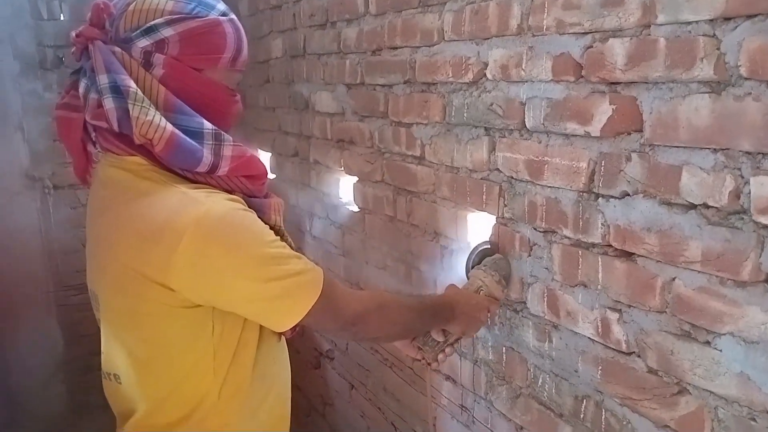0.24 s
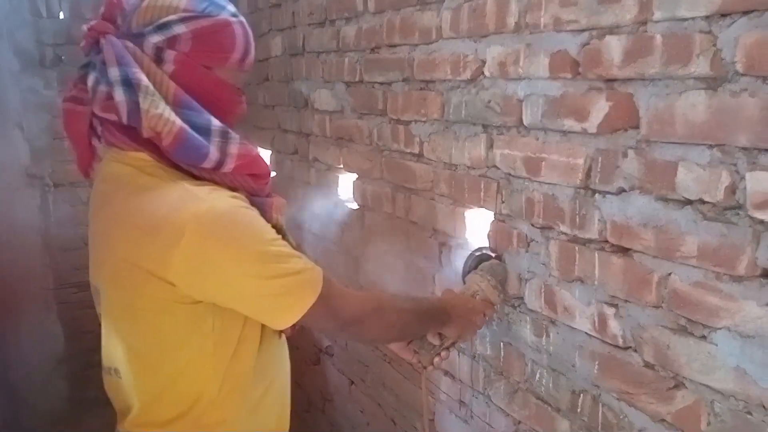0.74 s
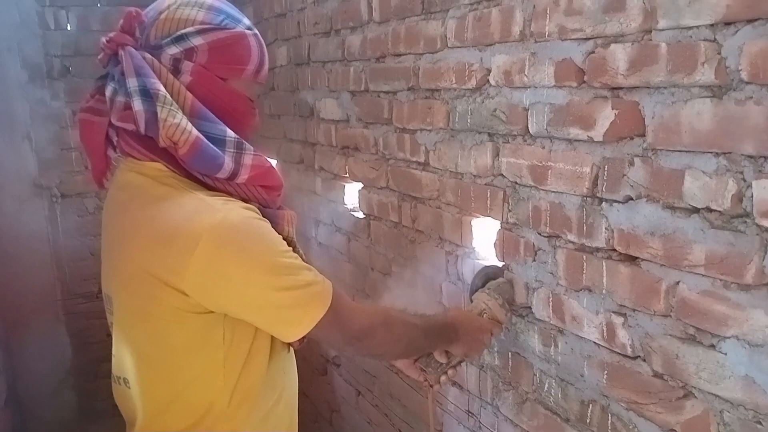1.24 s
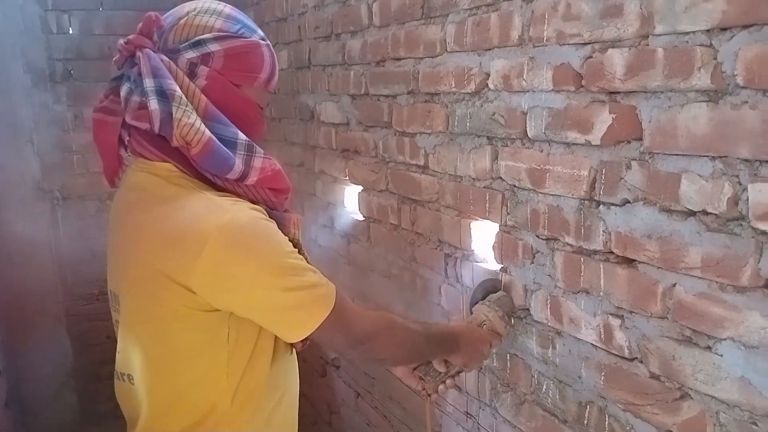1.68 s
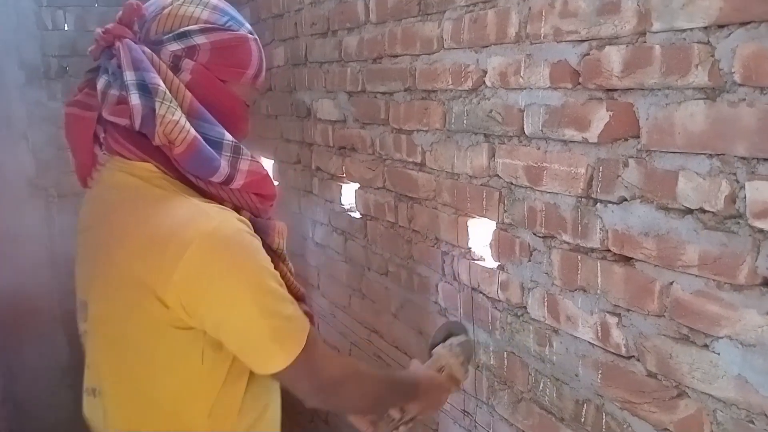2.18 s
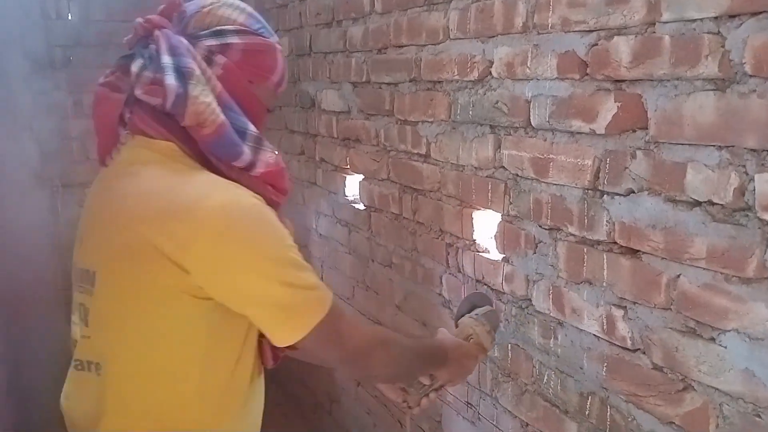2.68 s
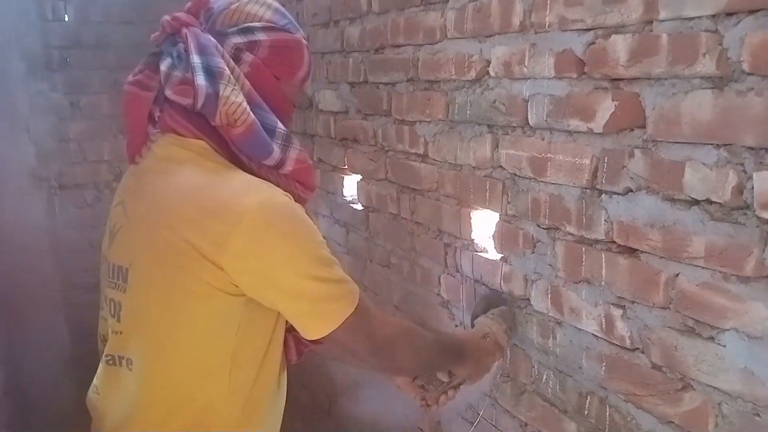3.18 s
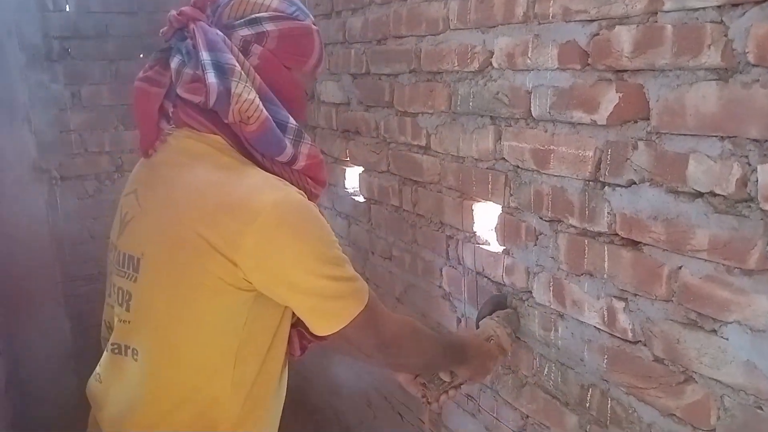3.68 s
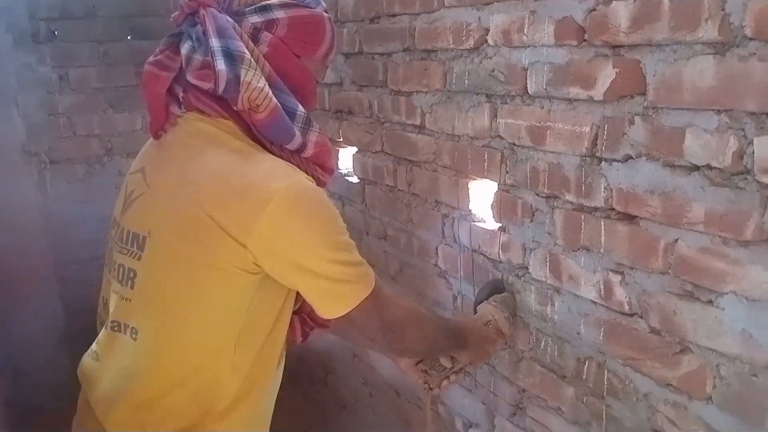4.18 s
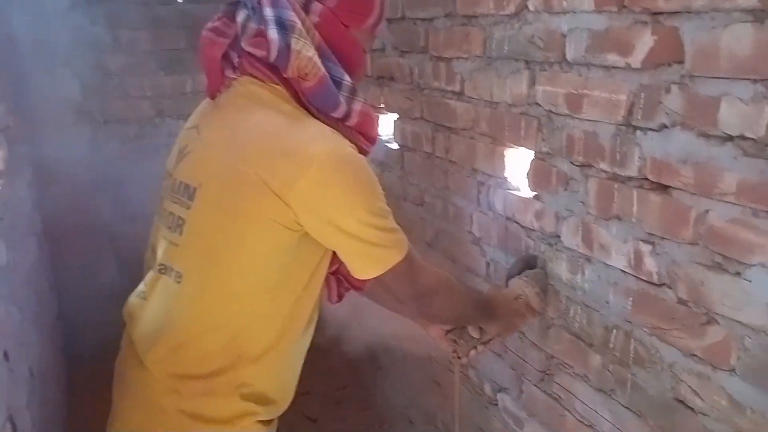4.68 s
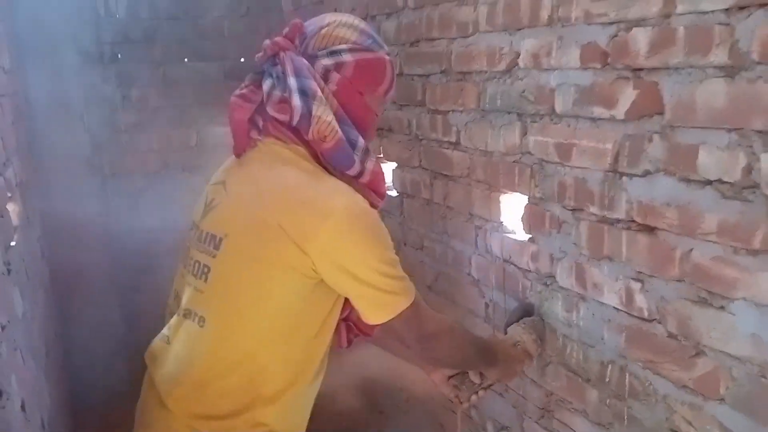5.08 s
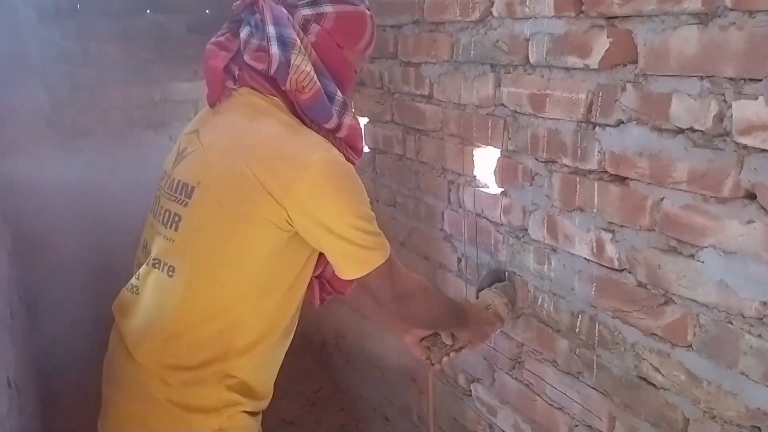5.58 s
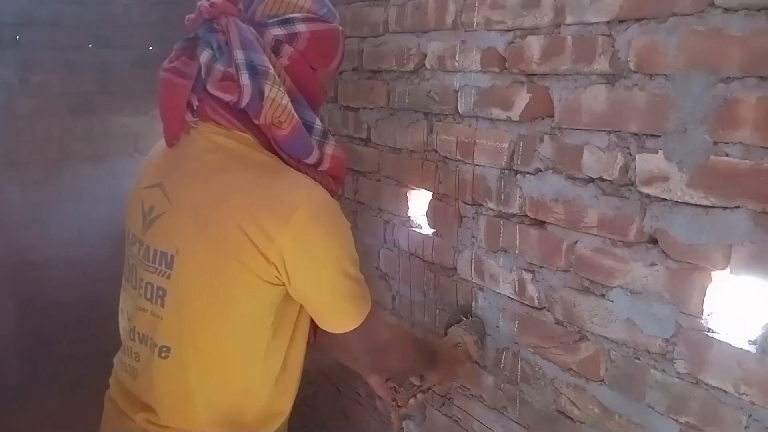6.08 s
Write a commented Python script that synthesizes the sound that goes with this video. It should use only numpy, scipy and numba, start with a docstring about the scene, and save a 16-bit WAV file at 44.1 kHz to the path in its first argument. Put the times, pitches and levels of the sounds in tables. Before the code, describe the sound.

Close, loud and continuous grinding of a steel disc in brick, rough and fluttering, with a short diffuse room tail. Brick crumbles in dull bursts underneath. The load eases midway and a high motor whine stands out, then sinks as the disc digs back in amid thudding fragments. After a last harsh surge the disc leaves the wall, leaving motor whine and hissing air.

```python
"""A handheld angle grinder cuts a groove in a brick wall: grit noise excites resonances of disc and guard.
The motor whine, harmonic and fractional lines on a varying shaft rate, climbs as the disc is eased out.
Brick crumbles in bursts of shaped noise and lumps break off as damped sines; the tool blows filtered air.
Bare walls answer the tool with a diffuse tail; at the end the disc is lifted clear."""
import sys
import numpy as np
from scipy import signal
from scipy.fft import rfft, irfft
from scipy.io import wavfile
from scipy.ndimage import uniform_filter1d
from numba import njit

SR = 44100
rng = np.random.default_rng(int(sys.argv[2]) if len(sys.argv) > 2 else 0)


def log_audio(samples):
    """Write samples as a 16-bit WAV file to the path given in sys.argv[1]."""
    # one column per channel
    frames = np.atleast_2d(samples).T
    # limit to full scale, then quantise
    limited = np.clip(frames, -1, 1)
    pcm = np.round(limited * 32767).astype(np.int16)
    wavfile.write(sys.argv[1], SR, pcm)


N = 279594

# Course of the cut, levels before the offset of each layer:
# [t/s, grinding level/dB, first singing mode level/dB, guard boom level/dB, disc treble level/dB]
CUT_COURSE = [(0.0, -22, -38, -23, -33), (0.1, -19.5, -29, -18, -32.5), (0.72, -19.5, -24.5, -20.5, -32),
              (1.32, -18.5, -24, -18.5, -32), (2.12, -19.5, -20, -24, -29.5), (2.21, -20, -24.5, -30, -27),
              (2.3, -20.5, -15.5, -23, -28), (2.44, -19, -29, -24, -30), (2.65, -20.5, -22, -20.5, -27.5),
              (2.91, -21, -32, -27.5, -29.5), (3.16, -19.5, -19.5, -20.5, -30),
              (3.28, -19, -21, -23.5, -30.5), (4.91, -20.5, -26, -22, -32), (5.1, -18, -17, -19.5, -29.5),
              (5.54, -18, -23.5, -22, -30.5), (5.79, -14.5, -18, -25, -26), (5.86, -15, -26, -19, -31),
              (5.98, -24.5, -34, -31, -39), (6.23, -22, -37, -33, -24.5), (6.34, -26, -36, -38, -39)]
START_TURNS = 390  # shaft turns per s at the start
CHATTER_DB, CHATTER_HZ = 2.0, 22.034  # the hands never press evenly


def undb(db):
    """Decibel definition: a level becomes an amplitude ratio."""
    return 10 ** (np.asarray(db) / 20)


def unit(x):
    """Normalisation to equal power: RMS value 1."""
    return x / np.sqrt(np.mean(x ** 2))


def curves(table):
    """Linear interpolation of every column against the first, t/s."""
    s, *columns = np.transpose(table)
    return [np.interp(np.arange(N) / SR, s, column) for column in columns]


def walk(rate):
    """Low-passed randomness: levels held 1 / rate s and slewed twice; spread near 1."""
    hold = int(SR / rate)
    steps = np.repeat(rng.standard_normal(N // hold + 1), hold)
    return 1.13 * uniform_filter1d(uniform_filter1d(steps, hold), hold)[:N]


def chatter():
    """Amplitude modulation in dB by the uneven pressure of the hands."""
    return CHATTER_DB * walk(CHATTER_HZ)


def follow(crumble_db, db, slope):
    """Linear level law: db when the crumbling is at -27 dB, slope in dB per dB around it."""
    return db + slope * (crumble_db + 27)


@njit
def svf(x, hz, width):
    """State-variable band-pass resonance with a moving centre, gain 1 there."""
    y, band, low = np.empty(len(x)), 0., 0.
    for i in range(len(x)):
        g, k = np.tan(np.pi * hz[i] / SR), width / hz[i]
        v = (band + g * (x[i] - low)) / (1 + g * (g + k))
        band, low, y[i] = 2 * v - band, low + 2 * g * v, k * v
    return y


def colour(x, points):
    """Spectral shaping: levels interpolated on log frequency along (f/Hz, level/dB) points."""
    hz, db = np.transpose(points)
    f = np.maximum(np.fft.rfftfreq(N, 1 / SR), 1)
    gain = undb(np.interp(np.log(f), np.log(hz), db))
    return unit(irfft(rfft(x) * gain, N))


def grit(scatter_db, flutter_db):
    """Shot-like excitation: noise with a few much larger grains and a fluttering pressure."""
    scatter = np.minimum(rng.exponential(size=N), 7)
    size = undb(scatter_db * scatter + flutter_db * walk(60))
    # each call draws fresh noise, a new spot on the rim, under the same grain sizes
    return lambda: unit(size * rng.standard_normal(N))


def broad(grains, modes):
    """Resonance under noise excitation: each band-pass is applied twice for steep skirts."""
    flat = np.ones(N)
    out = 0
    for hz, width, db in modes:
        once = svf(grains(), hz * flat, 1. * width)
        out = out + undb(db) * unit(svf(once, hz * flat, 1. * width))
    return unit(out)


def room(x):
    """Diffuse reverberation: bare walls answer with exponentially decaying noise."""
    t60_s, tail_db = 0.6, -10.5
    t = np.arange(int(.6 * SR)) / SR
    decay = np.exp(-np.log(1000) * t / t60_s)
    tail = rng.standard_normal(len(t)) * decay * (t > .006)  # 6 ms until the first reflection
    tail = tail / np.sqrt(np.sum(tail ** 2))
    return x + undb(tail_db) * signal.fftconvolve(x, tail)[:N]


def draught(eased):
    """Flow noise: cooling air and fan hiss, both flickering and stronger while the disc is eased."""
    # Air from the tool, before offsets: [t/s, cooling air level/dB, fan hiss level/dB]
    draught_course = [(0.0, -44.5, -42), (1.04, -42.5, -42), (1.46, -48, -43), (1.73, -39.5, -39),
                      (1.89, -51, -44), (2.42, -39, -39), (3.0, -43.5, -41), (3.64, -40, -41),
                      (3.8, -40, -41), (5.12, -45.5, -40), (5.58, -50, -41), (5.72, -37, -37),
                      (5.88, -42, -44), (6.02, -54, -47), (6.06, -40.5, -38), (6.34, -39, -38)]
    # Relative spectrum of the air stream: [f/Hz, level/dB per Hz]
    air_spectrum = [(4000, -2), (5000, -11), (6500, -7), (7500, 2), (10000, -0.5), (11000, -5),
                    (12500, 2.5), (13200, -2), (16000, -19)]
    # Fan resonances: [f/Hz, width of each pass/Hz, relative level/dB]
    fan_modes = [(13500, 1100, -2), (14400, 1600, 0), (15200, 1200, -3)]
    air_db, fan_db = curves(draught_course)
    gusts = grit(scatter_db=1.5, flutter_db=1)
    air_db = air_db + 6 + 1.5 * eased + 1.2 * walk(12)
    fan_db = fan_db + 3.5 * eased + 2.5 * walk(20)
    return undb(air_db) * colour(gusts(), air_spectrum) + undb(fan_db) * broad(gusts, fan_modes)


def lumps():
    """Impulsive fracture: each lump is a sudden crack that ends in a dull, heavily damped swing."""
    # Lumps of brick breaking off: [t/s, starting envelope level/dB before the layer offset, f/Hz]
    lump_events = [(0.101, -18, 452), (0.588, -21.5, 261), (1.077, -27, 164), (1.678, -21, 300),
                   (1.705, -21, 288), (1.731, -17, 420), (1.83, -14.5, 197), (1.845, -21, 122),
                   (2.126, -23, 374), (3.236, -24, 364), (3.331, -25, 444), (3.605, -18, 161),
                   (3.994, -17.5, 205), (4.156, -17.5, 229), (4.231, -27, 328), (4.287, -20, 167),
                   (4.527, -18, 139), (4.678, -16, 171), (4.868, -15.5, 350), (4.913, -20, 248),
                   (5.734, -25, 280), (6.22, -25, 412)]
    out = np.zeros(N + SR)
    for s, db, hz in lump_events:
        cycles = np.arange(int(4 * SR / hz)) * hz / SR
        i = int((s + .003) * SR)  # the lump gives way just after the first crunch
        swing = np.sin(2 * np.pi * cycles + 1.1) * np.exp(-1.3 * cycles)
        out[i:i + len(cycles)] += undb(db) * swing
    return out[:N]


def crumbling(crumble_db):
    """Granular noise of brick leaving the groove, low resonances, and lumps each at a fixed pitch."""
    # Relative spectrum of the rubble: [f/Hz, level/dB per Hz]
    rubble_spectrum = [(35, -38), (60, -9), (225, -3.5), (542, -3), (946, -3), (1160, -4.5), (2000, -11),
                       (2600, -35), (4400, -120)]
    # Low resonances: [f/Hz, width of each pass/Hz, relative level/dB]
    rumble_modes = [(62.6, 65, -16), (96, 68, -8.5), (147, 155, -2)]
    rubble = grit(scatter_db=3.3, flutter_db=1.5)
    crunch = undb(crumble_db + chatter()) * colour(rubble(), rubble_spectrum)
    rumble = undb(follow(crumble_db, db=-40.5, slope=1.64)) * broad(rubble, rumble_modes)
    return crunch + rumble + undb(5.5) * lumps()


def shaft():
    """First-order relaxation: after each load change the speed closes in on its new aim."""
    # Load changes: [t/s, shaft turns per s aimed at, settling time constant/s]
    load_steps = [(0, 400, 1.5), (2.09, 533, .3), (3.16, 477, .12), (3.8, 330, 1.15), (6.07, 400, .22)]
    t, speed = np.arange(N) / SR, np.full(N, 1. * START_TURNS)
    for s, aim, settle in load_steps:
        gap = speed[int(s * SR)] - aim
        relaxed = aim + gap * np.exp(-np.maximum(t - s, 0) / settle)
        speed = np.where(t < s, speed, relaxed)
    return speed


def whine(speed):
    """Forced vibration: lines on the trembling shaft rate swell while they cross a resonance."""
    # Lines from shaft, gear teeth, slots and commutator bars: [multiple of shaft rate, relative level/dB]
    whine_lines = [(1, -11), (2, -11), (3, -8), (4.33, 0), (6.7, 0), (7.67, -5), (10, -16), (11, -10),
                   (11.33, -16), (12, -7), (12.33, -12), (22, -15), (24, -3)]
    # Resonances that lift a passing line: [f/Hz, width/Hz, lift/dB]
    swell_modes = [(3570, 180, 17), (4600, 700, 13), (8900, 800, 20), (12000, 900, 5)]
    # Common level of the lines, loudest while the motor runs up: [t/s, level/dB]
    whine_course = [(1.95, -60), (2.15, -48), (2.3, -45), (2.45, -39), (2.7, -39), (2.95, -43), (3.2, -44),
                    (3.55, -48), (3.8, -52), (4.1, -64), (5.5, -60), (5.98, -54), (6.08, -45), (6.22, -41),
                    (6.34, -47)]
    whine_db, = curves(whine_course)
    waver_loaded, waver_free = .011, .005  # tremble of the speed, share
    freedom = np.clip((speed - START_TURNS) / 60, 0, 1)
    waver = waver_loaded + (waver_free - waver_loaded) * freedom
    turns = np.cumsum(speed * (1 + waver * walk(150))) / SR
    out = 0
    for k, db in whine_lines:
        swell_db = sum(lift / (1 + (2 * (k * speed - hz) / width) ** 2) for hz, width, lift in swell_modes)
        line_db = db + swell_db + 4 * walk(22)
        out = out + undb(line_db) * np.sqrt(2) * np.sin(2 * np.pi * k * turns)
    return undb(whine_db) * out


def scrape(grains, crumble_db, eased):
    """Frictional excitation of disc flank and tool case; the flank weakens while eased."""
    # Flank resonances: [f/Hz, width of each pass/Hz, relative level/dB]
    flank_modes = [(4290, 700, 6), (4900, 860, -14)]
    # Case resonances: [f/Hz, width of each pass/Hz, relative level/dB]
    case_modes = [(1627, 980, -2.5), (1936, 340, -2.5)]
    lifted_s, lifted_db = 5.94, -3.5  # the disc leaves the wall
    lifted = np.arange(N) / SR > lifted_s
    flank_db = follow(crumble_db, db=-37, slope=.65) - 8 * eased
    case_db = follow(crumble_db, db=-27, slope=.23) + chatter() + lifted_db * lifted
    return undb(flank_db) * broad(grains, flank_modes) + undb(case_db) * broad(grains, case_modes)


def squeals():
    """Narrow-band resonance: each squeal, as the rim catches, swells and fades as a Gaussian."""
    # Short squeals: [t/s at the centre, length/s between 1/e points, f/Hz, level/dB]
    squeal_events = [(2.73, 0.11, 7870, -30), (3.288, .04, 6800, -36), (3.32, .05, 8000, -39),
                     (3.86, .1, 6770, -39), (4.04, .03, 6780, -37), (4.26, .08, 6700, -43)]
    t, out = np.arange(N) / SR, 0
    for s, length, hz, db in squeal_events:
        ring = unit(svf(rng.standard_normal(N), np.full(N, 1. * hz), 15.0))  # 15 Hz wide
        out = out + undb(db) * np.exp(-(2 * (t - s) / length) ** 2) * ring
    return out


def disc(grains, speed):
    """Centrifugal stiffening: spin lifts sharp steel modes; each flickers as the contact shifts."""
    # Sharp modes at the starting speed: [f/Hz, half the width of each pass/Hz, relative level/dB]
    disc_modes = [(5330, 75, -10), (6700, 82, -17), (8220, 78, -5), (8810, 180, 0), (9320, 70, -5),
                  (10400, 52, -21), (10700, 80, -17), (11500, 90, -14), (12200, 140, -15),
                  (12700, 240, -16), (13700, 110, -7), (14600, 170, -19), (15400, 90, -14)]
    stiff = (speed / START_TURNS) ** .07
    out = 0
    for hz, width, db in disc_modes:
        centre = np.minimum(hz * stiff, 15400.)
        once = svf(grains(), centre, 2. * width)
        out = out + undb(db + 3.5 * walk(5.4)) * svf(once, centre, 2. * width)
    return unit(out)


def ringing(grains, crumble_db, speed, eased):
    """Modal ringing of the disc follows the crumbling and weakens while eased; squeals join it."""
    ring_db = follow(crumble_db, db=-29.5, slope=.15) - 12 * eased
    return undb(ring_db) * disc(grains, speed) + squeals()


def singing(grains, crumble_db):
    """Modal resonance: the three loudest disc modes sing under the noise of the grit."""
    # Singing modes: [f/Hz, width of each pass/Hz, level/dB (no effect: each mode is scaled alone)]
    sing_modes = [(3290, 105, 0), (2450, 170, 0), (2980, 100, 0)]
    _, first_db, guard_db, _ = curves(CUT_COURSE)
    # the first has its own level course, the second goes with the guard boom, the third with the crumbling
    levels = first_db, guard_db - 5.5, follow(crumble_db, db=-33, slope=.83)
    return sum(undb(db + 2.0 * walk(14)) * broad(grains, [mode]) for db, mode in zip(levels, sing_modes))


def cutting(grains):
    """Forced resonance: grit under the rim drives the tool body, the guard and the disc treble."""
    # Three sets of broad resonances: [f/Hz, width of each pass/Hz, relative level/dB]
    body_modes = [(2940, 490, 1), (3430, 570, 0.5), (3660, 510, -5.5)]
    guard_modes = [(2260, 220, 0.92), (2593, 570, 9.9)]
    rim_modes = [(7800, 550, -10), (8300, 600, -6), (8950, 700, 0), (9400, 450, -5)]
    cut_db, _, guard_db, rim_db = curves(CUT_COURSE)
    body = undb(cut_db - 2.5 + chatter()) * broad(grains, body_modes)
    guard = undb(guard_db - 1 + chatter()) * broad(grains, guard_modes)
    rim = undb(rim_db + chatter()) * broad(grains, rim_modes)
    return body + guard + rim


def falter():
    """Amplitude modulation: the tool falters for a moment and all its sound dips."""
    # Dips: [t/s at the centre, length/s between 1/e points, level change/dB]
    falter_events = [(2.207, 0.065, -3), (6.008, 0.046, -3)]
    t = np.arange(N) / SR
    return undb(sum(db * np.exp(-(2 * (t - s) / length) ** 2) for s, length, db in falter_events))


def scene():
    """Superposition: the tool sounds in the room; the crumbling brick is heard dry."""
    # Brick crumbling out of the groove, in bursts: [t/s, level/dB before chatter]
    crumble_course = [(0.0, -26), (0.39, -24), (0.56, -29), (0.58, -25.5), (1.45, -30.5), (1.5, -29),
                      (1.66, -34), (1.71, -22), (1.75, -24), (1.77, -28), (1.84, -22), (1.87, -31.5),
                      (2.1, -30.5), (2.15, -25.5), (2.19, -35), (2.9, -36.5), (2.91, -39.5), (3.32, -28),
                      (3.34, -21.5), (3.37, -32.5), (3.65, -21), (3.81, -27), (4.01, -22), (4.06, -28),
                      (4.39, -18.5), (4.47, -27.5), (4.57, -23), (5.1, -32.5), (5.61, -36), (5.76, -24),
                      (5.88, -29), (5.97, -38.5), (6.22, -33), (6.34, -37)]
    crumble_db, = curves(crumble_course)
    start, end, ramp = 2.3, 3.05, .066  # s, the disc is eased out of the groove
    eased, = curves([(start - ramp, 0), (start, 1), (end, 1), (end + ramp, 0)])
    speed = shaft()
    grains = grit(scatter_db=2.0, flutter_db=1.0)
    tool = draught(eased) + whine(speed) + scrape(grains, crumble_db, eased)
    tool = tool + ringing(grains, crumble_db, speed, eased) + singing(grains, crumble_db) + cutting(grains)
    return (room(falter() * tool) + crumbling(crumble_db))[None]


def record(dry):
    """Saturation and band limiting: the loudest peaks are rounded and the top is cut."""
    top_hz = 15510
    low_pass = signal.ellip(16, .5, 90, top_hz, fs=SR, output="sos")
    return signal.sosfilt(low_pass, np.tanh(1.1 * dry) / 1.1)


dry = scene()
out = record(dry)
log_audio(out)
```